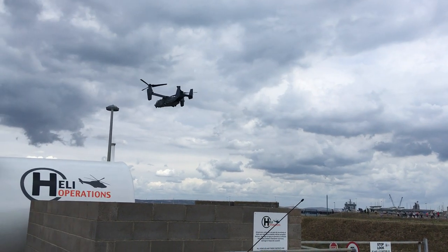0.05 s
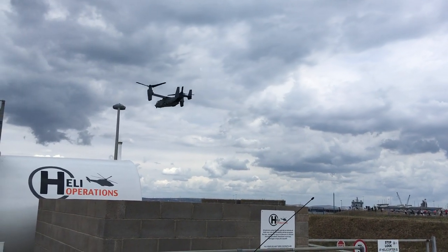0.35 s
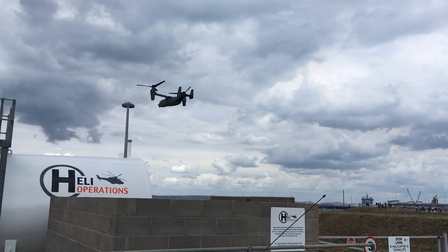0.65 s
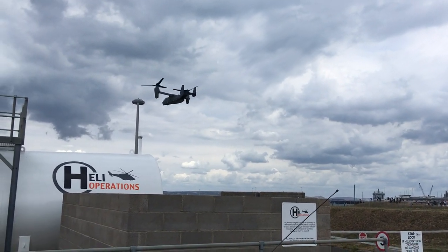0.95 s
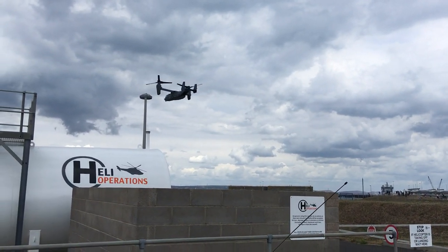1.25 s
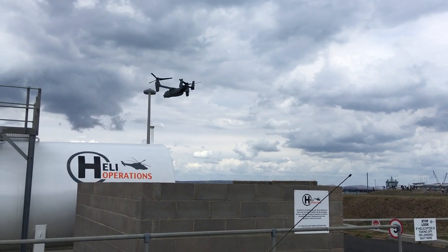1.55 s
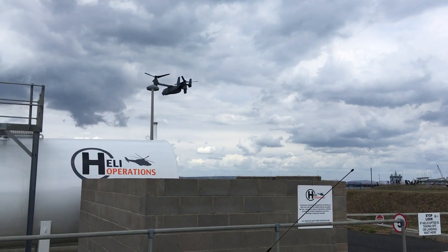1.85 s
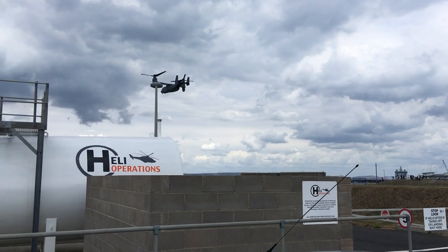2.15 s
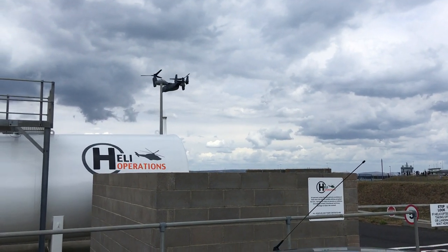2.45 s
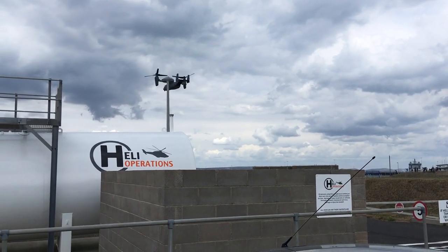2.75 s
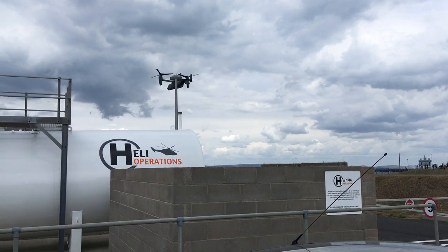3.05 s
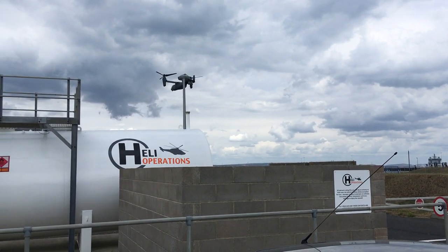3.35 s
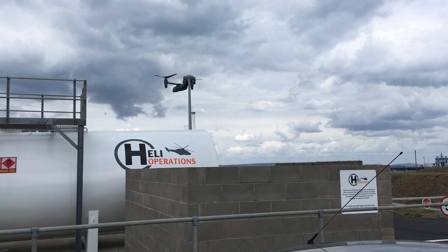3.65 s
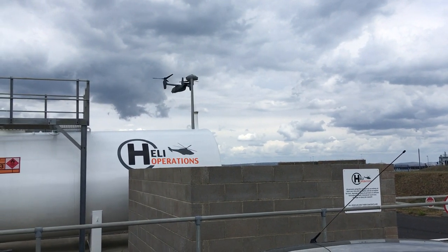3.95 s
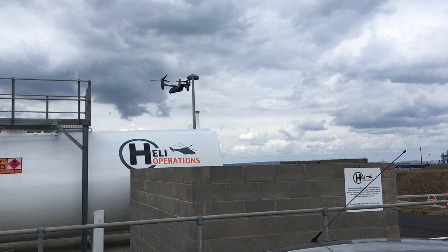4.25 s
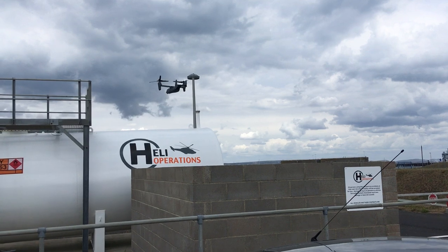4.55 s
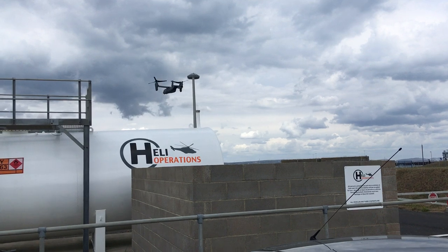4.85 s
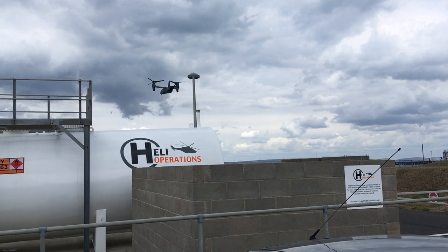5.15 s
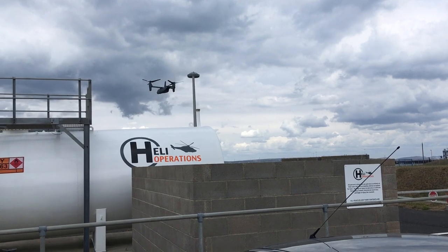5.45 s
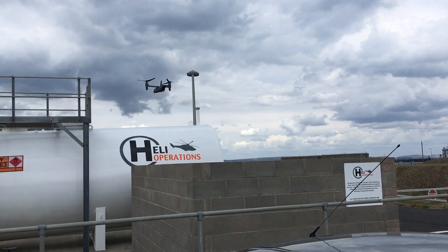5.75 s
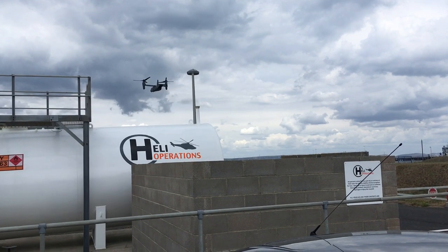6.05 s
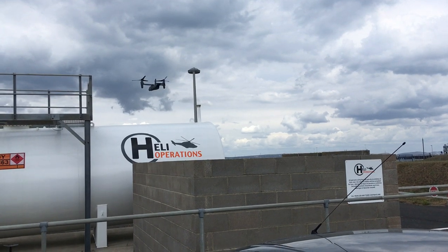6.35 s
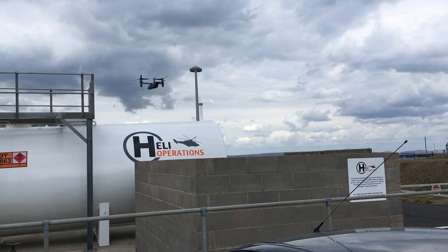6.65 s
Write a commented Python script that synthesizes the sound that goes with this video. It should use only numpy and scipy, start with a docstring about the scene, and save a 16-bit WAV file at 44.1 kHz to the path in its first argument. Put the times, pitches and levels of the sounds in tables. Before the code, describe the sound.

Outdoors on a windy day, the roar of a tiltrotor aircraft carries through the air, full of fast swishing blade beats, occasional hard slaps and a low throb. It continues throughout, growing slightly duller as the aircraft moves slowly off. Short gusts thump right on the single microphone early on, ease in the middle, then return more often, over a faint rumble of breeze.

```python
"""A tiltrotor aircraft flying slowly away over an airfield, heard from one microphone on a windy day.
Each blade pass is a swish in the roar of rotors and turbines, one blade in three slapping harder,
over the deep throb of two rotors beating. The air swallows more treble as the distance grows.
Close up, gusts buffet and pop on the microphone, with a light rumble of breeze between them."""
import sys
import numpy as np
from scipy import signal
from scipy.fft import rfft, irfft, next_fast_len
from scipy.io import wavfile
from scipy.ndimage import uniform_filter1d, minimum_filter1d

SR = 44100
rng = np.random.default_rng(int(sys.argv[2]) if len(sys.argv) > 2 else 0)


def store_wav(level_fs):
    """Save 16-bit WAV to argv[1]."""
    pcm = np.round(np.clip(np.atleast_2d(level_fs), -1, 1) * 32767)
    wavfile.write(sys.argv[1], SR, pcm.T.astype(np.int16))


N = 300321
TIME = np.arange(N) / SR
HOP = 256
FRAME_TIME = np.arange(N // HOP + 5) * HOP / SR
BIN_HZ = np.fft.rfftfreq(4 * HOP, 1 / SR)

BLADE_HZ, DOPPLER_SAG_HZ_PER_S, FIRST_PASS_S = 19.895, .104, .0277
BEAT_HZ, BEAT_RISE_HZ_PER_S = .48, .016  # between the two rotors' blade rates
START_DISTANCE, DISTANCE_PER_S = 0.76, .33  # relative distance from the microphone

# Levels are relative within each table.
# Rotor and turbine roar, before the air shapes it: (frequency [Hz], level [dB])
ROAR_SPECTRUM = [(20, -24), (45, 23), (100, 16.5), (180, 8.5), (290, 9), (480, 5), (680, 7), (1200, 4),
                 (1700, -1.5), (2500, -2.5), (4000, -9), (6300, -15.5), (9500, -26), (15000, -47.5)]
# How loud the rotors arrive and how deeply they swish: (time [s], level [dB], depth [factor])
ROTOR_CURVE = [(0, -34, 0.51), (.7, -34.5, 0.17), (1.0, -32, 0.54), (1.7, -32, 0.66), (2.55, -36, 0.78),
               (3.35, -33.5, 0.51), (3.7, -35.5, 0.41), (4.2, -35.5, 0.56), (5.0, -33, 1.6),
               (5.6, -34, 1.5), (6.3, -36, 0.66), (6.81, -35, .85)]
# The hardest blade slaps: (time [s], level [dB], length [s], treble [dB])
HARD_SLAPS = [(0.021, -29, .0029, 3), (0.175, -26.5, .0033, 1), (.632, -27, .0043, 2),
              (1.078, -27.5, .0056, 0), (1.238, -27, 0.005, 1), (1.846, -21, .0035, -1),
              (2.303, -30.5, .0035, 4), (2.608, -30, .0042, 3), (2.766, -30, 0.0057, 0),
              (3.221, -27, .007, -2), (3.313, -19.5, 0.0046, -7), (3.373, -23, 0.0064, -1),
              (3.524, -26, 0.0064, 0), (3.987, -28, .0034, 1), (4.76, -26.5, .0036, 0),
              (4.913, -26, 0.0055, 3), (5.69, -17.5, 0.0054, -7), (6.121, -21, 0.0013, -4)]
# Blades chopping through their own wake: (time [s], level [dB], brightness [dB])
CHOP_CURVE = [(0, -42, 0), (.4, -17.5, -4.5), (.9, -30.5, -6), (1.3, -28, 15), (2.2, -29, 6),
              (2.7, -41, -5), (3.1, -29, -7), (3.35, -25.5, -2), (3.7, -20.5, 1), (4.2, -32.5, 3),
              (4.9, -33.5, 1), (5.3, -20.5, -7), (6.2, -26, 11.5), (6.81, -29.5, -7)]
# The dull puff of a blade in the wake: (frequency [Hz], level [dB])
CHOP_SPECTRUM = [(20, -23), (100, 0.5), (200, 1.5), (330, 1.5), (600, -5.5), (1100, -10), (1800, -16.5),
                 (3500, -28), (9000, -71)]
# Strength of the blades' pressure pulses: (time [s], level [dB])
THROB_CURVE = [(0, -33), (.45, -27), (.7, -33.5), (1.05, -26), (1.55, -29), (1.85, -21), (2.65, -26.5),
               (2.95, -21.5), (3.85, -24.5), (4.2, -33.5), (4.6, -28.5), (5.0, -35), (5.7, -37),
               (6.15, -27.5), (6.81, -31)]
# The throb's strong low harmonics: (blade rate multiple [factor], level [dB], beat phase [cycles])
THROB_HARMONICS = [(2, -0.5, 0.83), (3, 1, 0.34), (4, -1.5, 0.17)]
# Gusts on the microphone: (start [s], length [s], level [dB], fade [dB], relative brightness [dB])
MIC_GUSTS = [(.02, .075, -20.5, -1, -3.5), (0.944, 0.036, -14.5, 9.5, -9), (1.03, .025, -29, 2, -4),
             (1.085, 0.097, -17.5, -2, -3.5), (1.235, 0.12, -15, 14, -9), (1.495, 0.16, -17, 8.5, -9),
             (2.376, 0.1, -20.5, -0.5, -3.5), (3.98, 0.099, -18.5, 3, -23), (4.551, 0.17, -16.5, 4, -10.5),
             (5.143, 0.025, -19.5, -2, -3.5), (5.444, 0.042, -21, -1.5, -33), (5.623, 0.047, -16.5, 6, -12),
             (5.816, .03, -17.5, 3.5, -5.5), (5.861, 0.17, -21.5, -4, -5), (6.073, 0.055, -22.5, -7, -4.5),
             (6.434, 0.032, -13.5, 8, -12), (6.504, 0.12, -12.5, 8.5, -3), (6.653, 0.027, -18.5, 6.5, -2),
             (6.742, 0.032, -17.5, 0, -28)]
# Turbulence at the microphone port: (frequency [Hz], level [dB])
WIND_SPECTRUM = [(20, -25), (55, 1), (110, 1), (220, 0), (330, -3), (620, -6), (800, -12.5), (1100, -19),
                 (1900, -47), (4000, -61), (9000, -75)]
# The strongest thumps from passing blades and pops from eddies on the microphone: (time [s], level [dB], pitch
# [Hz], length [s])
THUMPS_AND_POPS = [(.434, -3, 140, 0.0035), (.632, -13, 744, .002), (.61, -13, 195, .016), (.695, -9, 178, .016),
                   (.735, -12.5, 198, 0.013), (1.125, -16, 726, .003), (1.152, -6, 475, 0.0037),
                   (1.239, -7, 546, 0.0056), (1.339, -10, 640, .0026), (2.398, -26, 445, 0.0054),
                   (2.817, -16, 333, 0.0028), (3.423, -15, 695, 0.004), (3.937, -15, 414, 0.0053),
                   (4.889, -2.5, 617, 0.0017), (5.16, -7, 239, 0.0042), (5.822, -9, 220, 0.0046),
                   (5.955, -10, 486, .0045), (6.027, -7, 590, .0024), (6.126, -10, 121, 0.0093),
                   (6.132, -2, 950, .00049), (6.532, -7, 546, .0069), (6.576, -4, 198, 0.0057),
                   (6.667, -21, 800, .0024)]
# Narrow dips in the microphone's response: (frequency [Hz], width [Hz], gain [dB])
MIC_DIPS = [(1410, 83, -1.5), (3050, 280, -2), (4910, 380, -4.5), (7740, 520, -3), (10470, 300, -5.5)]


def roar(swishes, level_db=-0.5, low_swish=0.91, high_swish=1.68, flutter_db=0.58, fade_db=-0.03):
    """Turbine and wake noise from afar, swelling with each blade pass, most deeply in the treble."""
    air = through_air()
    rotor_db, swish_depth = follow(ROTOR_CURVE)
    low = lowpass(air, hz=2000)
    out = np.zeros(N)
    for band, depth in ((low, low_swish), (air - low, high_swish)):
        power = 1 + depth * swish_depth * swishes
        pulsing = np.sqrt(power / uniform_filter1d(power, size=13500))
        out += band * pulsing * amp(fade_db * wander(5.2))
    return out * amp(level_db + rotor_db + flutter_db * wander(160))


def through_air(patchy_db=1.5, treble_loss_db=8.0, body_db=1.5, body_loss_db=4.5, swell_db=3.5):
    """Rotor noise after crossing turbulent air: patchy, losing treble and low body with distance."""
    t = FRAME_TIME[:, None]
    further = START_DISTANCE + DISTANCE_PER_S * t - 1
    patches = rng.standard_normal((len(FRAME_TIME), len(BIN_HZ)))
    patches = unit(uniform_filter1d(uniform_filter1d(patches, size=14, axis=0), size=7, axis=1))
    absorbed = treble_loss_db * further * (BIN_HZ / 10000) ** 1.02
    body = (body_db - body_loss_db * further) / (1 + (BIN_HZ / 800) ** 4)
    # the mid-range swells once, briefly
    swell = swell_db * np.exp(-((t - 4.37) / 0.19) ** 2 - (np.log((BIN_HZ + 1) / 900) / 0.7) ** 2)
    level_db = spectrum_db(ROAR_SPECTRUM, BIN_HZ) - absorbed + swell + body + patchy_db * patches
    air = moving_noise(amp(level_db))
    return air / np.std(colour(air, lambda f: (f > 1500) & (f < 4000)))


def blade_passes():
    """Blades passed so far; their rate sinks as the aircraft turns away (Doppler)."""
    return BLADE_HZ * (TIME - FIRST_PASS_S) - DOPPLER_SAG_HZ_PER_S * TIME ** 2 / 2


def nearest_blade():
    """The number of the nearest blade pass, and the time since it in s."""
    passes = blade_passes()
    blade = np.round(passes).astype(int)
    return blade, (passes - blade) / BLADE_HZ


def blade_swishes(width_s=0.0074, strength=1.02, leading_gain=1.35, uneven_db=1.75, jitter_s=0.0013):
    """Swish power: a bump per pass, rising faster than it falls, the leading blade of three strongest."""
    blade, since = nearest_blade()
    size, slip = rng.standard_normal((blade.max() + 2, 2)).T
    since = since - jitter_s * slip[blade]
    skew = np.where(since > 0, 1.15, 1 / 1.15)
    bump = np.exp(-(since / (width_s * skew)) ** 2)
    gain = strength * np.where(blade % 3 == 0, leading_gain, 1) * amp(uneven_db * size[blade])
    return gain ** 2 * bump


def blade_slaps(level_db=1.0, usual_db=3.0, uneven_db=2.0, usual_length_s=.0045, bite_db=3.0):
    """Once a turn the leading blade cuts a tip vortex: a short, bright burst; some are much harder."""
    def burst(since, length):
        width = length * np.where(since < 0, 0.6, 1)
        return np.exp(-np.minimum(abs(since) / width, 20) ** 1.6)

    def crack_band(f, low_hz=1300, top_hz=7500, bite_hz=2200):
        bite = amp(bite_db * np.exp(-(np.log((f + 1) / bite_hz) / 0.2) ** 2))
        return f / np.hypot(f, low_hz) / np.hypot(1, f / top_hz) * bite

    blade, since = nearest_blade()
    size = rng.standard_normal(blade.max() + 2)
    gain = amp(follow(ROTOR_CURVE)[0] + usual_db + uneven_db * size[blade])
    body = treble = (blade % 3 == 0) * gain * burst(since, usual_length_s)
    for time, db, length, treble_db in HARD_SLAPS:
        hard = amp(db) * burst(TIME - time, length)
        body = np.maximum(body, hard)
        treble = np.maximum(treble, hard * amp(treble_db))
    crack = colour(through_air(), crack_band)
    low = lowpass(crack, hz=3000, slope=6)
    return amp(level_db) * (body * low + treble * (crack - low))


def wake_chop(swishes, level_db=-4.5, sharpness=0.66):
    """Each blade meets the wake with a dull puff."""
    air = steady_noise(CHOP_SPECTRUM)
    low = lowpass(air, hz=350)
    chop_db, bright_db = follow(CHOP_CURVE)
    puffs = (low + amp(bright_db) * (air - low)) * swishes ** sharpness
    puffs /= np.sqrt(uniform_filter1d(puffs ** 2, size=6750))
    return puffs * amp(level_db + chop_db)


def throb(level_db=-2.0, second_rotor=0.81, upper_db=-10, fall_db=2.0, waver_db=2.5):
    """Both rotors' pressure pulses, beating: three strong low harmonics and wavering weaker ones."""
    passes = blade_passes()
    beats = BEAT_HZ * TIME + BEAT_RISE_HZ_PER_S * TIME ** 2 / 2

    def rotor_pair(k, beat_phase, drift):
        angle = 2 * np.pi * (k * passes + drift)
        return np.cos(angle) + second_rotor * np.cos(angle + 2 * np.pi * (k * beats + beat_phase))

    out = np.zeros(N)
    for k, db, beat_phase in THROB_HARMONICS:
        out += amp(db) * rotor_pair(k, beat_phase, drift=0.03 * wander(3.3))
    for step, k in enumerate(range(5, 12)):
        gain = amp(upper_db - fall_db * step + waver_db * wander(2.8))
        out += gain * rotor_pair(k, rng.random(), drift=0.16 * wander(2.75))
    return np.sqrt(2) * amp(level_db + follow(THROB_CURVE)[0]) * out


def near_echo(x, strength=0.13, delay_s=.00261):
    """A short reflection beside the microphone carves shallow, evenly spaced dips."""
    return colour(x, lambda f: 1 - strength * np.exp(-2j * np.pi * f * delay_s))


def gusts(level_db=2.5, lumpy_db=2.5, ragged_db=2.0, treble_db=6, attack_s=0.0037, release_s=0.012):
    """Turbulence right at the microphone: each gust hits, holds and lets go; faster air is brighter."""
    eddies = unit(steady_noise(WIND_SPECTRUM)) * amp(lumpy_db * wander(47))
    eddies /= np.sqrt(uniform_filter1d(eddies ** 2, size=2600))
    low = lowpass(eddies, hz=400)
    high = (eddies - low) * unit(amp(ragged_db * wander(110)))
    out = np.zeros(N)
    for start, length, db, fade_db, bright_db in MIC_GUSTS:
        t = TIME - start
        attack = np.clip(t / attack_s + .5, 0, 1)
        hold = amp(db - fade_db * np.clip(t / length, 0, 1))
        release = np.exp(-np.clip((t - length) / release_s, 0, 20))
        out += attack * hold * release * (low + amp(bright_db + treble_db) * high)
    return amp(level_db) * out


def thumps_and_pops(level_db=-2, small_count=16, small_db=-17, small_hz=430, small_length_s=0.0037):
    """Short thumps from passing blades and wind, falling in pitch; small pops come at random in the gusts."""
    small = []
    for which, when, pitch in rng.random((small_count, 3)):
        start, length = MIC_GUSTS[int(which * len(MIC_GUSTS))][:2]
        octaves = 0.63 * (2 * pitch - 1)
        small.append((start + when * length, small_db, small_hz * 2 ** octaves, small_length_s))
    out = np.zeros(N)
    for time, db, hz, length in small + list(THUMPS_AND_POPS):
        near = abs(TIME - time) < 3 * length
        age = (TIME[near] - time) / length
        cycles = hz * length * (age - .05 * age ** 2) + rng.random()
        out[near] += amp(db) * np.exp(-age ** 2) * np.cos(2 * np.pi * cycles)
    return amp(level_db) * out


def port_rasp(time_s=2.43, half_length_s=0.069, level_db=-27, centre_hz=1200, lumpy_db=3):
    """The fastest gust scrapes across the edge of the microphone port."""
    hiss = colour(rng.standard_normal(N), lambda f: f / centre_hz / (1 + (f / centre_hz) ** 4))
    gate = np.exp(-np.minimum(abs(TIME - time_s) / half_length_s, 10) ** 4)
    return amp(level_db) * unit(hiss * amp(lumpy_db * wander(88))) * gate


def breeze(level_db=-37, lumpy_db=8.0):
    """A light rumble of wind on the microphone, heard between the gusts."""
    rumble = lowpass(steady_noise(WIND_SPECTRUM), hz=330)
    return amp(level_db) * unit(rumble * amp(lumpy_db * wander(23)))


def amp(db):
    """Decibels to gain."""
    return 10 ** (np.asarray(db) / 20)


def unit(x):
    """Scales to rms 1."""
    return x / np.sqrt(np.mean(x ** 2) + 1e-20)


def follow(curve):
    """The columns of a curve at every sample."""
    times, *columns = np.transpose(curve)
    return [np.interp(TIME, times, column) for column in columns]


def spectrum_db(spectrum, hz):
    """A spectrum's level at hz, interpolated on a log-frequency axis."""
    f, db = np.transpose(spectrum)
    return np.interp(np.log(hz + 1), np.log(f + 1), db)


def colour(x, gain):
    """Filters x by a gain given as a function of frequency."""
    size = next_fast_len(N + SR // 2, True)
    return irfft(rfft(x, size) * gain(np.fft.rfftfreq(size, 1 / SR)), size)[:N]


def lowpass(x, hz, slope=4):
    """The part of x below hz."""
    return colour(x, lambda f: 1 / (1 + (f / hz) ** slope))


def wander(rate_hz):
    """A smooth random drift of rms 1."""
    return unit(colour(rng.standard_normal(N), lambda f: np.exp(-(f / rate_hz) ** 2)))


def steady_noise(spectrum):
    """Noise with the given spectrum."""
    return colour(rng.standard_normal(N), lambda f: amp(spectrum_db(spectrum, f)))


def moving_noise(magnitude):
    """Noise whose short-time spectrum follows a frames x bins magnitude."""
    white = rng.standard_normal(magnitude.shape) + 1j * rng.standard_normal(magnitude.shape)
    return signal.istft((white * magnitude).T, nperseg=4 * HOP, noverlap=3 * HOP)[1][:N]


def scene():
    """The aircraft out over the airfield and the wind right on the microphone, in mono."""
    swishes = blade_swishes()
    aircraft = near_echo(roar(swishes) + wake_chop(swishes) + blade_slaps()) + throb()
    wind = gusts() + port_rasp() + thumps_and_pops() + breeze()
    return (aircraft + wind)[None]


def record(dry, hiss_db=-69.5, ceiling=0.69, low_cut_hz=34, top_hz=15700):
    """The microphone chain: response dips, bass cut, a quick limiter, hiss, then the band limit."""
    def response(f):
        return amp(sum(db * np.exp(-((f - hz) / width) ** 2) for hz, width, db in MIC_DIPS))

    x = colour(dry[0], response)
    x = x - lowpass(x, low_cut_hz, slope=8)
    headroom = np.minimum(1, ceiling / (abs(x) + 1e-9))
    limiter = uniform_filter1d(minimum_filter1d(headroom, size=401), size=401)
    x = x * limiter + amp(hiss_db) * rng.standard_normal(N)
    x = x * signal.windows.tukey(N, .0006)
    band_limit = signal.firwin(511, top_hz, window=("kaiser", 9), fs=SR)
    return signal.oaconvolve(x, band_limit, "same")[None]


dry = scene()
out = record(dry)
store_wav(out)
```